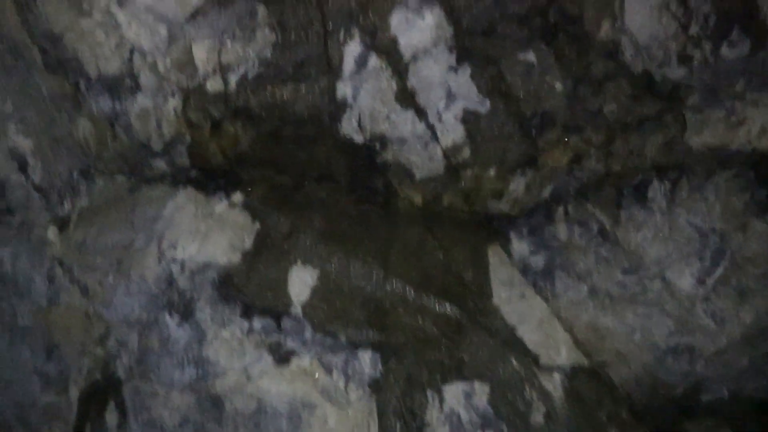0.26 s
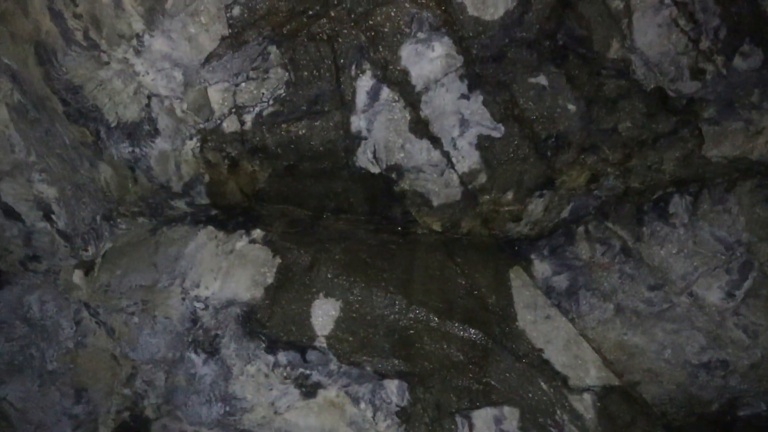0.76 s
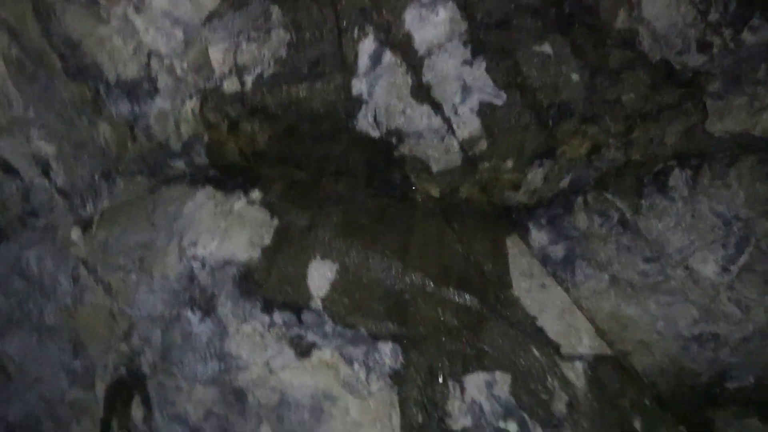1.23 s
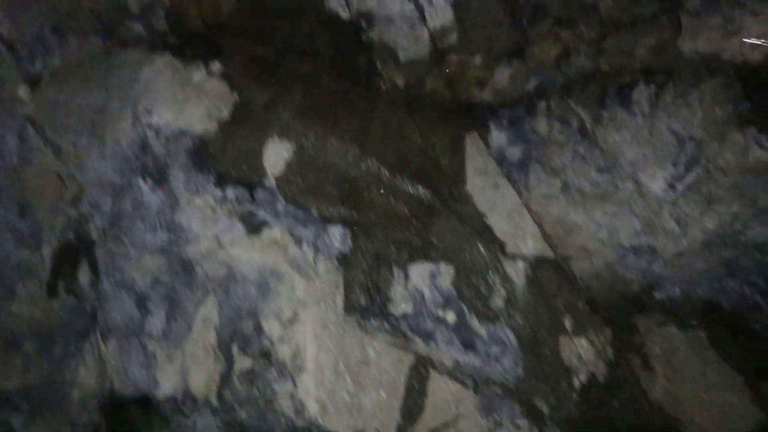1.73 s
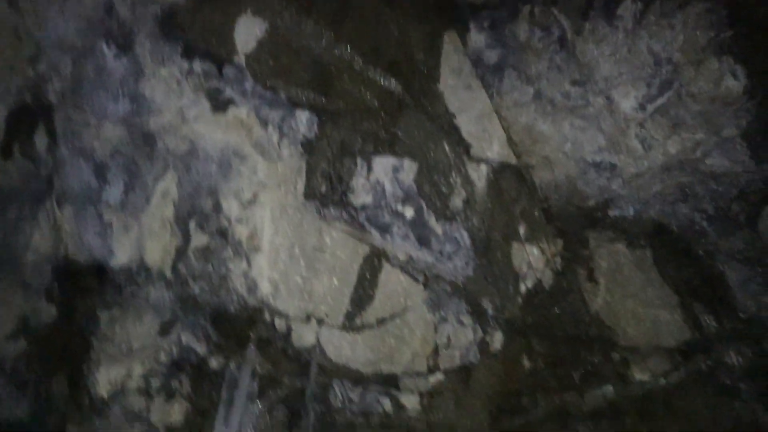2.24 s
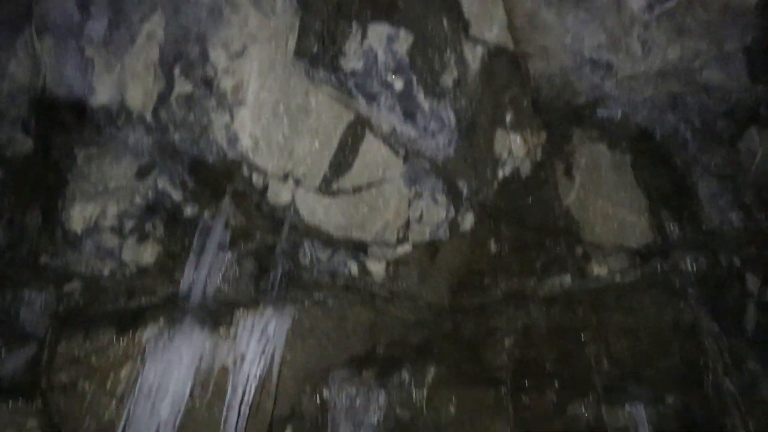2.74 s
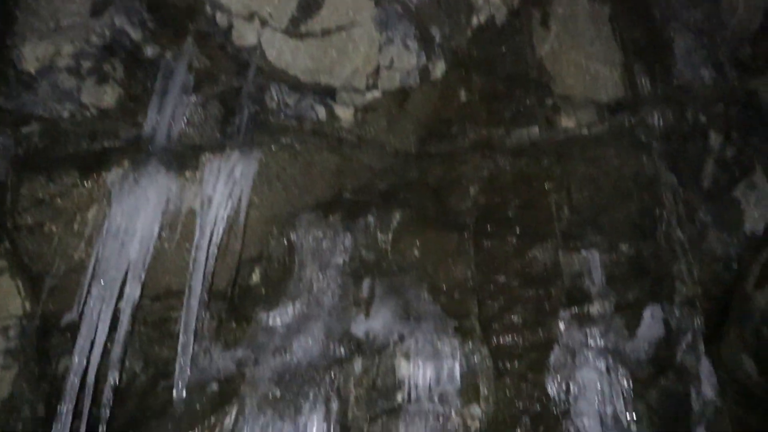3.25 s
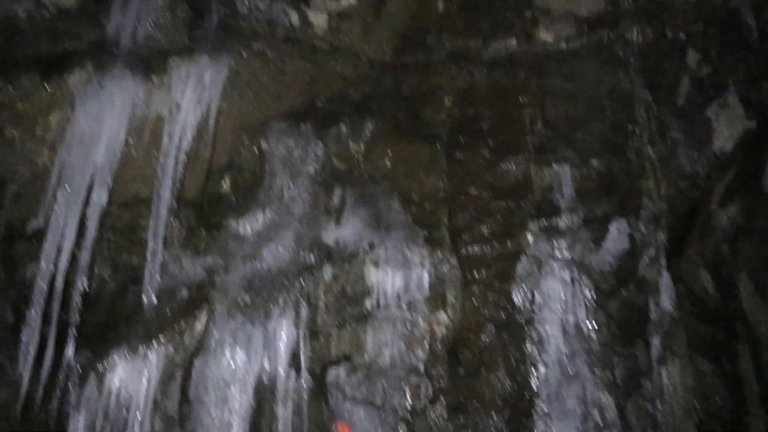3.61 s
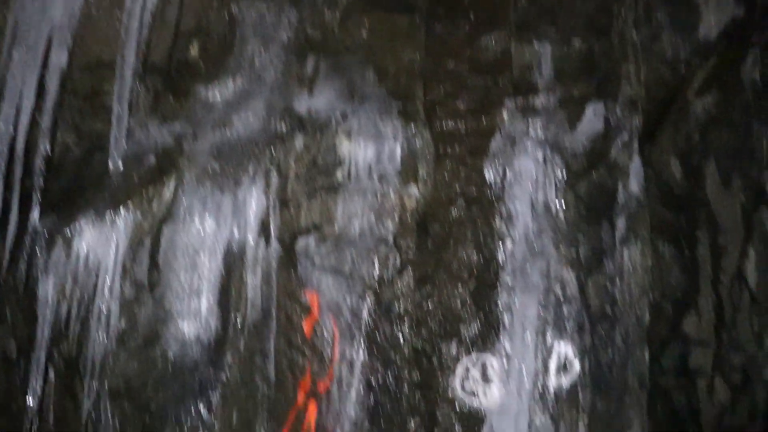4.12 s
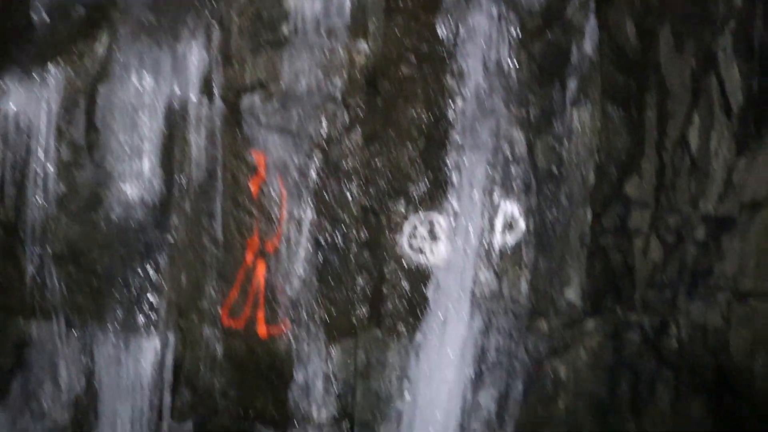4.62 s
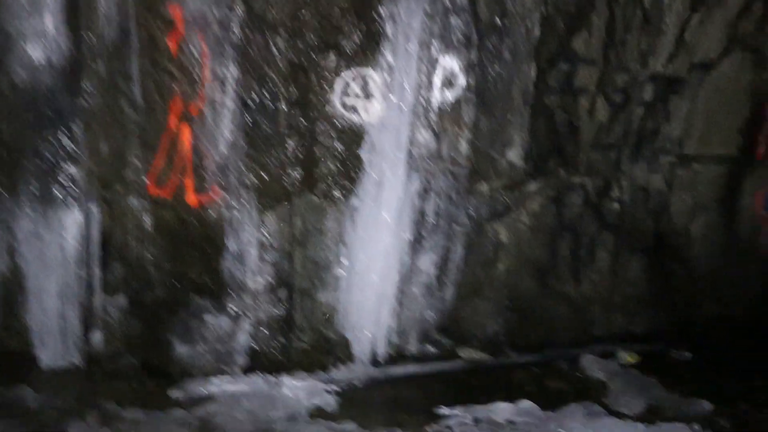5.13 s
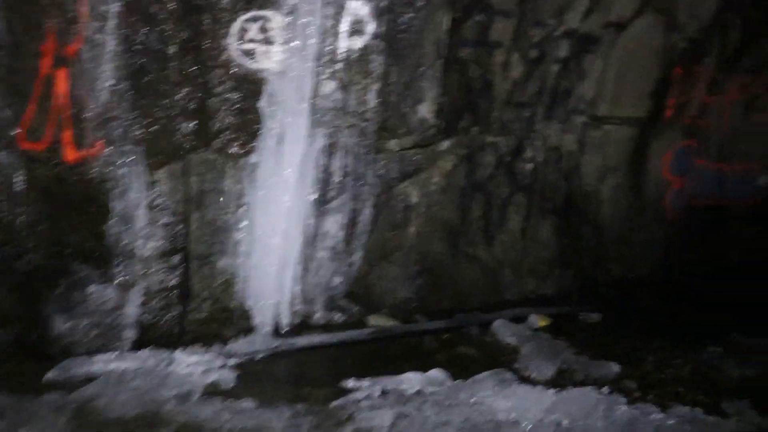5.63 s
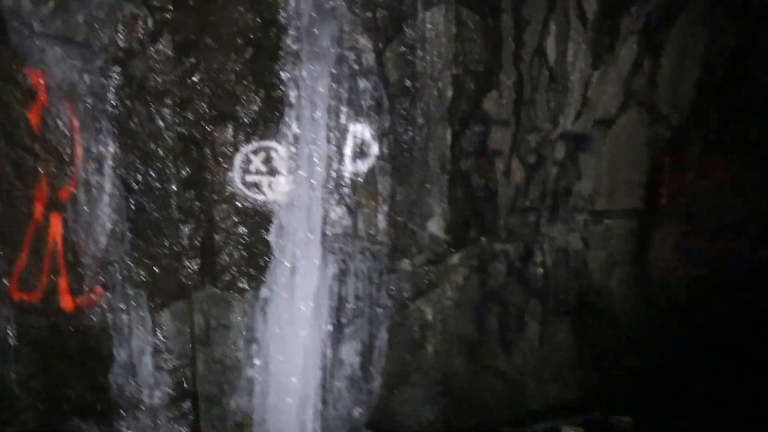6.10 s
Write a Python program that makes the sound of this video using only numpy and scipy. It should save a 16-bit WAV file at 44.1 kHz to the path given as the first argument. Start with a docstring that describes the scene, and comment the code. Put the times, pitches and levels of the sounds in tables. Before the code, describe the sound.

Countless small water drops tick and splash in an echoing stone passage, distant trickles hissing behind, growing nearer and sharper as it goes on.

```python
"""Meltwater drips inside a rock tunnel. From the start a low rumble and the wash of far trickles, made of shaped
noise, lie under a patter of tiny noise bursts, small bubbles, fine spray and drops falling into a far pool.
Splashes of fading noise and ticking drops join in, then ringing bubbles plink in puddles; the rock echoes them.
As the microphone turns down towards the wet floor, the floor sounds dip, then grow closer and brighter, with
more strong drips. Late on come two gritty crunches and two soft knocks."""
import sys
import numpy as np
from scipy import signal
from scipy.fft import rfft, irfft
from scipy.io import wavfile
from scipy.ndimage import uniform_filter1d

SR = 44100
rng = np.random.default_rng(int(sys.argv[2]) if len(sys.argv) > 2 else 0)


def store_pcm(level_fs):
    """Save levels as 16-bit WAV."""
    pcm = np.round(np.clip(level_fs, -1, 1) * 32767).astype(np.int16)
    wavfile.write(sys.argv[1], SR, np.atleast_2d(pcm).T)


N = 280476
TIME = np.arange(N) / SR


def amp(db):
    """Turns decibels into a gain."""
    return 10 ** (np.asarray(db) / 20)


def evened(x):
    """Scales a sound to an average (rms) strength of 1."""
    return x / np.sqrt(np.mean(x ** 2) + 1e-20)


def read(points, hz):
    """Reads a table at any frequency, with straight lines between points on a log-frequency axis."""
    f, value = np.transpose(points)
    return np.interp(np.log(hz + 1), np.log(f + 1), value)


def follow(rows):
    """Reads a table of levels over time at every sample."""
    time_s, level = np.transpose(rows)
    return np.interp(TIME, time_s, level)


def add(mix, s, sound):
    """Mixes a sound in at time s, cutting it off at the end of the mix."""
    part = mix[max(0, round(s * SR)):][:len(sound)]
    part += sound[:len(part)]


def coloured(x, points):
    """Filters x by a table of levels over frequency, then evens it to rms 1."""
    gain = amp(read(points, np.fft.rfftfreq(len(x), 1 / SR)))
    return evened(irfft(rfft(x) * gain, len(x)))


def band(x, hz, octaves):
    """Keeps a round-topped band of pitches about hz, at rms 1; works on one sound or on rows of sounds."""
    size = x.shape[-1]
    away = np.log2((np.fft.rfftfreq(size, 1 / SR) + 1) / hz) / octaves
    y = irfft(rfft(x) / np.sqrt(1 + (away ** 2 / 2) ** 3), size)
    return y / np.sqrt(np.mean(y ** 2, axis=-1, keepdims=True) + 1e-20)


def droplets(size, per_s, spread_db):
    """Random clicks of either sign, most small and a few large."""
    chance = rng.random(size)
    large = np.minimum(rng.exponential(1, size), 4)
    return (chance < per_s / SR) * amp(spread_db * large) * rng.choice([-1, 1], size)


# how near the water is, as the level of its steady fizz: (time [s], level [dB])
NEARNESS = [(0.0, -38.5), (0.85, -38), (1.1, -40), (2.07, -38.5), (2.2, -35.5), (2.91, -38), (3.26, -38),
            (3.67, -34), (4.71, -35), (4.99, -32.5), (5.56, -34), (5.77, -32.5), (6.11, -34), (6.36, -34)]
CLOSE_DB = -33  # nearness at which the layers that use it have their own levels


def approach(level_db, growth):
    """Gain of a layer that grows as the microphone nears the water, by growth dB per dB of nearness."""
    return amp(level_db + growth * (follow(NEARNESS) - CLOSE_DB))


# colour of the far trickles: (frequency [Hz], relative level [dB per Hz])
WASH_COLOUR = [(53, -37), (90, -6.5), (127, -6.5), (690, -2), (1110, 1.5), (1570, 0), (5900, -1.5),
               (8350, -4), (10600, -10), (13200, -12.5), (15000, -17), (16000, -26)]


def wash(level_db=-35.5, patchy_db=2.0, growth=0.32):
    """Far trickles blurred by the tunnel: hiss that swells in patches of pitch and time."""
    z = signal.stft(rng.standard_normal(N), nperseg=512)[2]
    patches = rng.standard_normal(z.shape)
    patches = uniform_filter1d(patches, size=7, axis=0)  # smooth over pitch
    patches = evened(uniform_filter1d(patches, size=14, axis=1))  # smooth over time
    hiss = signal.istft(z * amp(patchy_db * patches), nperseg=512)[1][:N]
    return coloured(hiss, WASH_COLOUR) * approach(level_db, growth)


# colour of the tunnel's rumble: (frequency [Hz], relative level [dB per Hz])
RUMBLE_COLOUR = [(10, 1.5), (25, -2.5), (38, 1.5), (51, -0.5), (56, 4.5), (62, -3.5), (69, -11),
                 (90, -18.5), (170, -19), (198, -16.5), (230, -19), (500, -45)]
# its loudness: (time [s], level [dB])
RUMBLE_LEVEL = [(0, -51), (1.4, -51), (2.6, -46), (3.6, -49.5), (4.8, -51), (5.6, -45.5), (6.36, -49.5)]


def rumble():
    """The tunnel's low rumble: deep noise that slowly rises and falls in level."""
    return coloured(rng.standard_normal(N), RUMBLE_COLOUR) * amp(follow(RUMBLE_LEVEL))


# colour of the small drops: (frequency [Hz], relative level [dB per Hz])
PATTER_COLOUR = [(1000, -38), (2000, -0.5), (3200, 0), (5500, 6), (7000, 1), (8400, 7.5), (9800, -5.5),
                 (13000, -1.5), (16000, -10)]


def patter(level_db=-35.5, count=3600, spread_db=6.5, break_s=0.0024, octaves=0.36, growth=1.86):
    """Countless small drops of many pitches; each snaps and breaks up within a few milliseconds."""
    t, out = np.arange(640) / SR, np.zeros(N)
    when, pitch, length, large = rng.random((count, 4)).T[:, :, None]
    hz = 2200 * (14000 / 2200) ** pitch
    fade = np.exp(-t / (break_s * (0.92 + length)))  # 0.92 to 1.92 times break_s
    drops = band(rng.standard_normal((count, len(t))), hz, octaves) * fade
    sizes = amp(spread_db * np.minimum(-np.log(large), 3.7))  # most are small, a few large
    drops *= sizes * np.sqrt(hz) / np.linalg.norm(drops, axis=1, keepdims=True)
    for s, drop in zip(when[:, 0] * N / SR, drops):
        add(out, s, drop)
    return coloured(out, PATTER_COLOUR) * approach(level_db, growth)


# the wet floor coming into line with the microphone: (time [s], level [dB] before each layer's own level_db)
FLOOR_LEVEL = [(0, -48), (2.0, -57.5), (3.3, -46), (3.7, -40.5), (4.4, -44.5), (5.4, -41), (6.36, -37)]


def floor_gain(level_db):
    """Gain of a layer that comes from the wet floor."""
    return amp(follow(FLOOR_LEVEL) + level_db)


# colour of the water's dull body: (frequency [Hz], relative level [dB per Hz])
HOLLOW_COLOUR = [(80, -22), (150, -11), (198, 2), (250, -5.5), (400, -3.5), (600, -2.5), (1100, -17)]


def hollow(level_db=-7):
    """The dull body of the running water: noise coloured by a resonance of the tunnel."""
    return coloured(rng.standard_normal(N), HOLLOW_COLOUR) * floor_gain(level_db)


def bubble(hz, ring_s, rise=0.02, onset_cycles=0.93, scatter=0.32):
    """A trapped bubble swells, rings and rises in pitch; nearby rock roughens the ring."""
    t = np.arange(4096) / SR
    turns = np.cumsum(hz * (1 + rise * np.tanh(t / ring_s - 1))) / SR
    shape = (1 - np.exp(-(turns / onset_cycles) ** 2)) * np.exp(-t / ring_s)
    rough = scatter * band(rng.standard_normal(len(t)), hz, 0.26)
    return (np.sin(2 * np.pi * turns) + rough) * shape / shape.max()


def gurgle(level_db=-1, per_s=130, spread_db=3.4, ring_cycles=5):
    """Small bubbles popping at random in the puddles, each at one of 24 pitches."""
    pitches = np.geomspace(1800, 3800, num=24)
    out = np.zeros(N)
    for hz in pitches:
        pops = droplets(N, per_s / len(pitches), spread_db)
        out += signal.oaconvolve(pops, bubble(hz, ring_cycles / hz))[:N]
    return evened(out) * floor_gain(level_db)


def spray(level_db=-1, per_s=75, spread_db=6.5, centre_hz=10500, octaves=1.0, break_s=0.002, snap=1.8):
    """Fine droplets flung off the floor spit close by: a bright snap and a very short fizz each."""
    t = np.arange(512) / SR
    snap_s = .0003
    shape = np.exp(-t / break_s) + snap * np.exp(-t / snap_s)
    strength = signal.oaconvolve(abs(droplets(N, per_s, spread_db)), shape)[:N]
    spits = strength * rng.standard_normal(N)
    return band(spits, centre_hz, octaves) * floor_gain(level_db)


# how long the rock walls ring: (frequency [Hz], time to fade by 60 dB [s])
TUNNEL_FADE = [(200, 0.73), (900, 0.99), (2500, 0.55), (6000, 0.22), (14000, 0.94)]


def tunnel(x):
    """Diffuse echo of the rock walls: a noise tail that builds up, then fades at its own rate for each pitch."""
    hz, t, z = signal.stft(rng.standard_normal(SR), SR, nperseg=256)
    fade = amp(-60 * t / read(TUNNEL_FADE, hz)[:, None])
    tail = signal.istft(z * fade, SR, nperseg=256)[1]
    tail *= 1 - np.exp(-np.arange(len(tail)) / SR / 0.033)  # build-up time constant 33 ms
    return signal.fftconvolve(x, tail / np.linalg.norm(tail))[:N]


def shower(hz, octaves, fade_s, rise_s=0.0028, grainy=1.3, blur=0.016):
    """Spray falls back as tiny droplets and melts into its own echo; slow-fading splashes swell more slowly."""
    t = np.arange(32768) / SR
    fall = rng.standard_normal(len(t)) + grainy * evened(droplets(len(t), 900, 2.4))
    swell = 1 - np.exp(-t / (rise_s + blur * fade_s))
    shape = swell * np.exp(-t / fade_s) * (1 - (t / t[-1]) ** 2)  # the last factor ends it in silence
    return band(fall, hz, octaves) * shape / shape.max()


# drops into a far pool, heard only as the tunnel's ringing:
# (time [s], level [dB] before level_db, centre [Hz])
FAR_PLOPS = [(0.0, -44.5, 1140), (.38, -47.5, 800), (.84, -39.5, 930), (2.35, -45, 920), (3.16, -39, 825),
             (3.58, -44, 930), (4.665, -47, 890), (5.42, -44.5, 830), (6.09, -42, 913)]


def far_plops(level_db=-1, octaves=0.15, fade_s=0.36):
    """Drops into a distant pool arrive as a hollow, slowly fading ring of narrow noise."""
    out = np.zeros(N)
    for s, db, hz in FAR_PLOPS:
        add(out, s, amp(db + level_db) * shower(hz, octaves, fade_s))
    return out


# splashes heard as diffuse spray:
# (time [s], level [dB] before level_db, centre [Hz], fade time constant [s])
SPLASHES = [(.12, -35.5, 5570, 0.33), (.64, -35, 5530, 0.28), (.875, -34, 3950, 0.17),
            (1.288, -39, 8500, 0.22), (1.6, -40, 3570, 0.35), (1.93, -41, 1400, 0.1),
            (2.1, -36.5, 5300, 0.45), (2.742, -25, 4140, 0.079), (2.749, -38, 2220, 0.28),
            (2.86, -34, 4870, 0.23), (3.4, -34, 6000, 0.11), (3.58, -41, 710, 0.25),
            (4.049, -36, 2580, 0.35), (4.441, -26.5, 10000, 0.021), (4.716, -34, 2630, 0.084),
            (5.06, -33, 2600, 0.063), (5.71, -26, 2870, 0.024), (5.838, -32, 4580, 0.1),
            (6.11, -35, 2360, 0.043), (6.245, -26.5, 5200, 0.13)]


def splashes(level_db=-1, octaves=0.35, narrowing=0.2):
    """Large drops burst into spray: brief and broad near by, long and narrow far off."""
    out = np.zeros(N)
    for s, db, hz, fade_s in SPLASHES:
        brevity = .2 / fade_s  # octaves is the width of a splash that fades in 0.2 s
        add(out, s, amp(db + level_db) * shower(hz, octaves * brevity ** narrowing, fade_s))
    return out


def lesser_drips(count=26, peak_db=-15, wet_db=-31.0, spread_db=3.5, centre_hz=6800, octaves=0.47, growth=1.6):
    """Weaker drops fall at random all through, louder as the water nears; rows as in DRIPS."""
    when, hard, wet, pitch = rng.random((count, 4)).T
    s = (np.arange(count) + when) * N / SR / count  # one drop in each equal slice of time
    near_db = growth * (np.interp(s, TIME, follow(NEARNESS)) - CLOSE_DB)
    tick_level = peak_db + near_db + spread_db * (2 * hard - 1)
    splat_level = wet_db + near_db + spread_db * (2 * wet - 1)
    hz = centre_hz * 2 ** (octaves * (2 * pitch - 1))
    return list(zip(s, tick_level, hz, splat_level))


def tick(hz, cycles):
    """The pressure snap of a drop's impact: a few quickly fading cycles."""
    turns = hz * np.arange(256) / SR
    age = turns / cycles
    return age * np.exp(1 - age) * np.sin(2 * np.pi * turns)


# the loudest drops that hit stone close by:
# (time [s], tick level [dB] before tick_db, tick pitch [Hz], splat level [dB])
DRIPS = [(0.8798, -18, 4860, -31), (2.112, -14, 4200, -38), (2.4712, -13, 5670, -33),
         (2.7213, -3, 3970, -24), (2.732, -3, 4800, -27), (2.741, -7, 4400, -29),
         (2.8665, -14.5, 4600, -34), (3.0569, -16, 3220, -31), (3.224, -17, 3870, -27.5),
         (3.391, -13.5, 4970, -36), (3.6578, -5, 4700, -29), (3.7618, -20, 4260, -22),
         (3.7984, -22, 5200, -25), (3.8343, -8, 6700, -31), (4.036, -13.5, 5700, -29.5),
         (4.1626, -24, 5640, -22), (4.278, -6, 6600, -34), (4.3173, -20, 7860, -21.5),
         (4.4368, -3.5, 10000, -25), (4.591, -13.5, 5430, -27.5), (4.609, -6, 7900, -28),
         (4.631, -7.5, 5130, -23), (4.778, -12, 5840, -22), (4.8092, -11, 6400, -39),
         (4.848, -10, 6300, -27), (4.956, -6.5, 7760, -35), (5.0489, -5.5, 3040, -25),
         (5.195, -3.5, 6800, -28), (5.2222, -9, 6600, -28), (5.3298, -15, 7200, -24),
         (5.3664, -21, 2700, -25.5), (5.514, -27, 3260, -23.5), (5.6575, -10, 7200, -27),
         (5.8244, -1.5, 6600, -29), (5.8299, -13, 5260, -14.5), (5.838, 2, 5300, -32),
         (5.899, -12, 3950, -26.5), (6.0178, -15, 3560, -26.5), (6.071, -19, 7040, -25),
         (6.12, -7, 3500, -20), (6.1394, -11, 5200, -38), (6.23, -0.5, 5000, -22.5),
         (6.2355, -5, 4870, -25), (6.313, -7, 7500, -28)]


def drips(tick_db=-4, splat_s=0.0079, spread_s=0.00025, bounce_s=.0006):
    """Each drop snaps on the stone, a nearby wall throws back a weaker snap, then it spreads and breaks up."""
    out, t = np.zeros(N), np.arange(2048) / SR
    cycles, bounce = .85, .5
    for s, peak_db, hz, wet_db in list(DRIPS) + lesser_drips():
        size = amp(peak_db + tick_db)
        add(out, s, size * tick(hz, cycles))
        bounce_hz = hz * rng.uniform(0.78, 2.0)  # the bounced snap is mostly higher
        add(out, s + bounce_s, bounce * size * tick(bounce_hz, cycles))
        shape = (1 - np.exp(-t / spread_s)) * np.exp(-t / splat_s)
        add(out, s, amp(wet_db) * band(rng.standard_normal(len(t)), hz, 0.51) * shape)
    return out


# the loudest drops that trap a bubble in a puddle:
# (time [s], level [dB] before level_db or impact_db, pitch [Hz])
PLINKS = [(1.868, -28.5, 1510), (1.926, -29.5, 1400), (2.324, -29.5, 2150), (2.377, -31, 1750),
          (2.488, -27.5, 1544), (2.527, -33.5, 906), (2.945, -36.5, 556), (3.148, -23.5, 1627),
          (3.533, -24.5, 3000), (3.584, -27.5, 908), (3.585, -22, 2120), (3.664, -26.5, 1120),
          (3.785, -28.5, 2050), (3.997, -33.5, 945), (4.128, -27.5, 1950), (4.161, -19, 2610),
          (4.195, -22, 2050), (4.409, -26, 2360), (4.659, -22.5, 2380), (4.662, -28.5, 1510),
          (4.716, -30, 925), (4.792, -26.5, 1845), (4.838, -28, 1426), (5.049, -20.5, 2550),
          (5.169, -33.5, 553), (5.222, -26.5, 1645), (5.244, -26, 2530), (5.4, -24.5, 2440),
          (5.427, -33.5, 825), (5.513, -30, 2010), (6.049, -26, 2400), (6.084, -21.5, 1830),
          (6.094, -29.5, 918), (6.099, -14.5, 2300), (6.107, -24, 2250)]
RING_S, RING_SLOPE = 0.01, 0.84  # ring time constant [s] of a 1 kHz bubble; higher bubbles die sooner


def plinks(level_db=2.0, smear_octaves=0.11, impact_db=-14):
    """A wet slap and a ringing bubble. Returns the direct sound and the scattered sound for the tunnel echo."""
    direct, feed, t = np.zeros(N), np.zeros(N), np.arange(1024) / SR
    impact_s = 0.004
    for s, peak_db, hz in PLINKS:
        khz = hz / 1000
        ring = amp(peak_db + level_db) * bubble(hz, RING_S / khz ** RING_SLOPE)
        slap = band(rng.standard_normal(len(t)), 1.14 * hz, 1.0) * np.exp(-t / impact_s)
        add(direct, s, amp(peak_db + impact_db) * slap)
        add(direct, s, ring)
        add(feed, s, abs(ring) * band(rng.standard_normal(len(ring)), hz, smear_octaves))
    return direct, feed


# gritty crunches on the floor: (time [s], length [s], level [dB], centre [Hz], width [octaves])
CRUNCHES = [(4.857, 0.1, -30.5, 1110, 0.74), (5.638, 0.18, -34.5, 750, 1.3)]


def crunches():
    """Short clusters of dull grit clicks, faded in and out."""
    out = np.zeros(N)
    for s, length, db, hz, octaves in CRUNCHES:
        grit = band(droplets(16384, 900, 3.3), hz, octaves)[:int(length * SR)]
        add(out, s, amp(db) * evened(grit) * signal.windows.tukey(len(grit), .6))
    return out


# soft low knocks: (time [s], peak level [dB], pitch [Hz])
KNOCKS = [(5.219, -25, 171), (5.603, -24.5, 158)]


def knocks():
    """Single dull pushes of pressure: a smooth bump with a dip on either side."""
    out = np.zeros(N)
    for s, db, hz in KNOCKS:
        u = (np.pi * hz * (TIME - s)) ** 2
        out += amp(db) * (1 - 2 * u) * np.exp(-u)
    return out


def scene():
    """Near water, its echo, and the far background."""
    near = patter() + gurgle() + spray() + drips() + crunches()
    bubbles, bubble_feed = plinks()
    echo = tunnel(amp(-8) * near + amp(-5.5) * bubble_feed)
    far = wash() + rumble() + hollow() + far_plops() + splashes()
    return (near + bubbles + echo + far + knocks())[None]


EDGE_HZ = 15950  # top of the recorded band


def record(dry):
    """Clips at full scale, then removes what lies above the band edge."""
    lowpass = signal.firwin(511, EDGE_HZ, window=("kaiser", 9), fs=SR)
    return signal.oaconvolve(np.clip(dry, -1, 1), lowpass[None], "same")


dry = scene()
out = record(dry)
store_pcm(out)
```